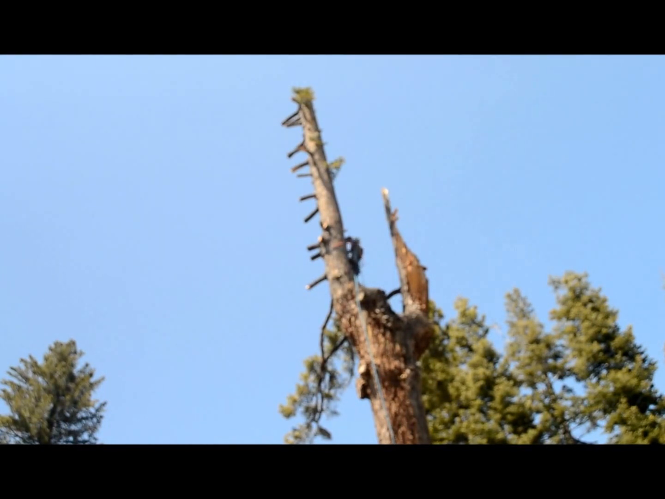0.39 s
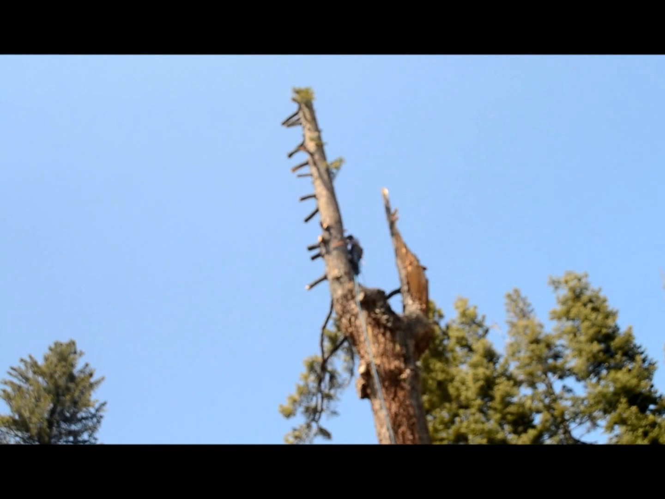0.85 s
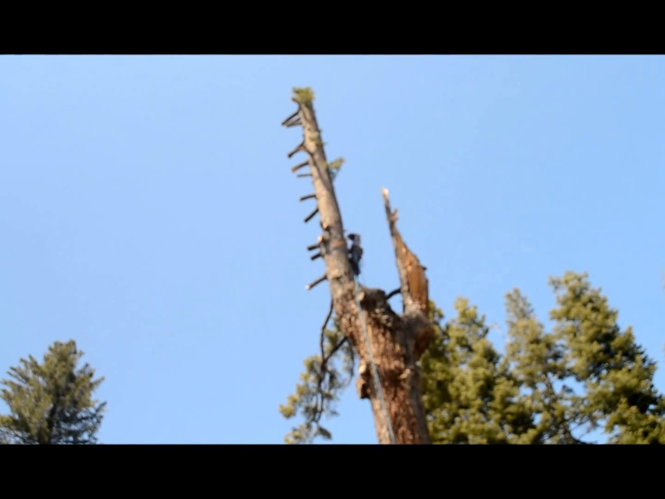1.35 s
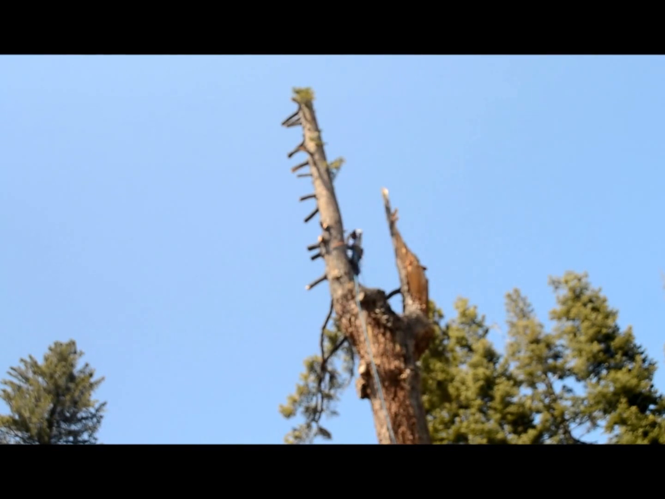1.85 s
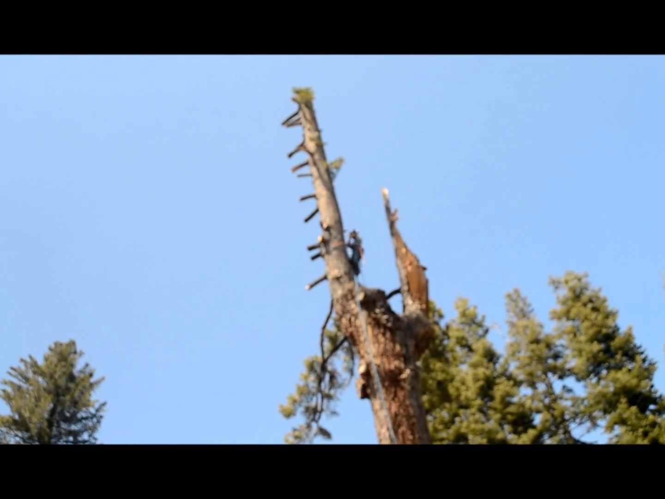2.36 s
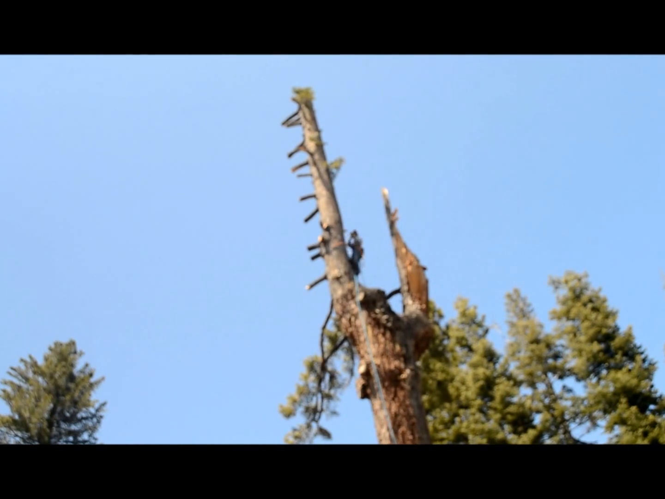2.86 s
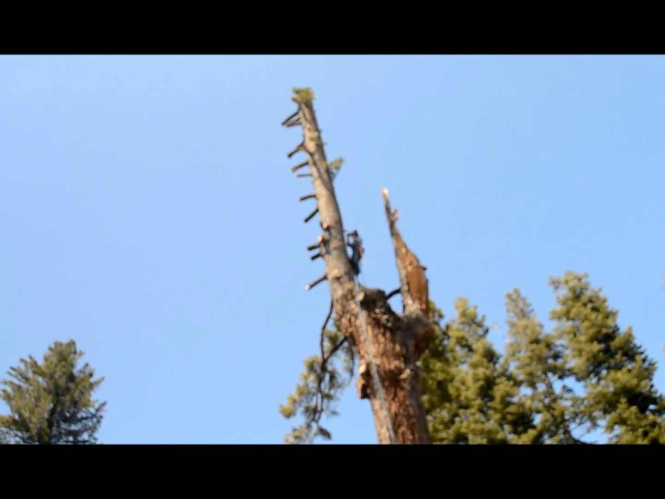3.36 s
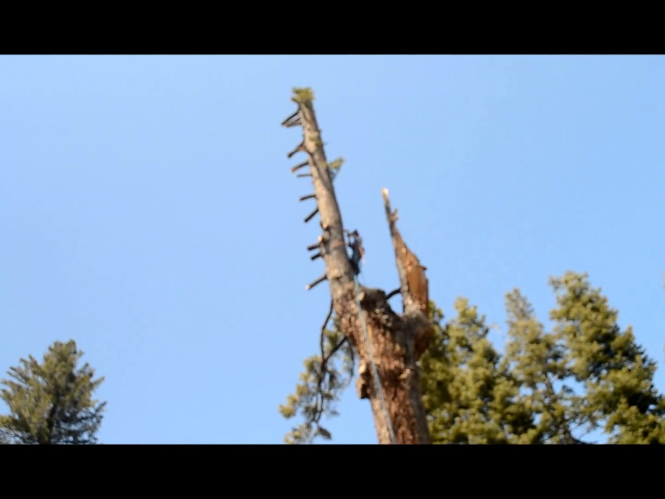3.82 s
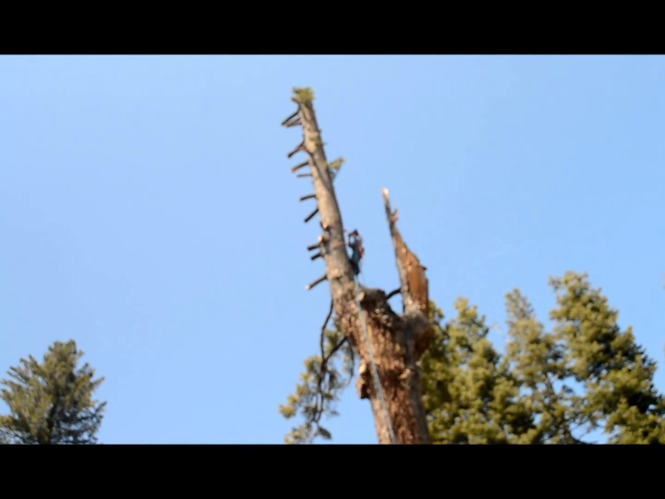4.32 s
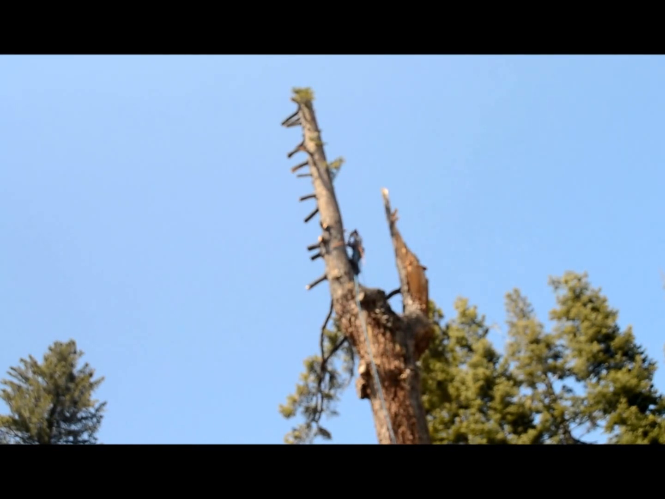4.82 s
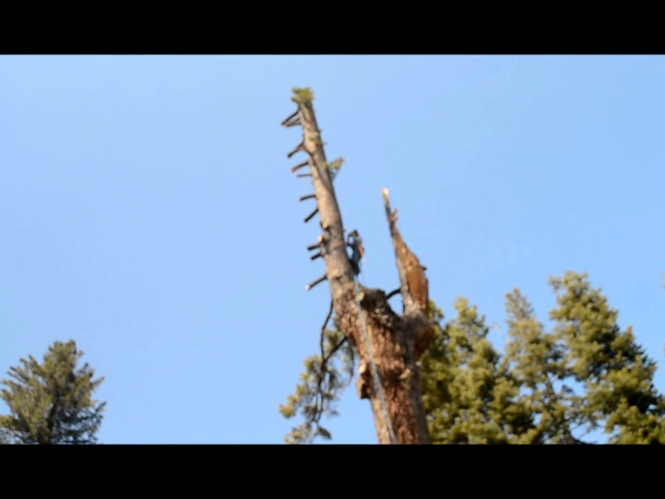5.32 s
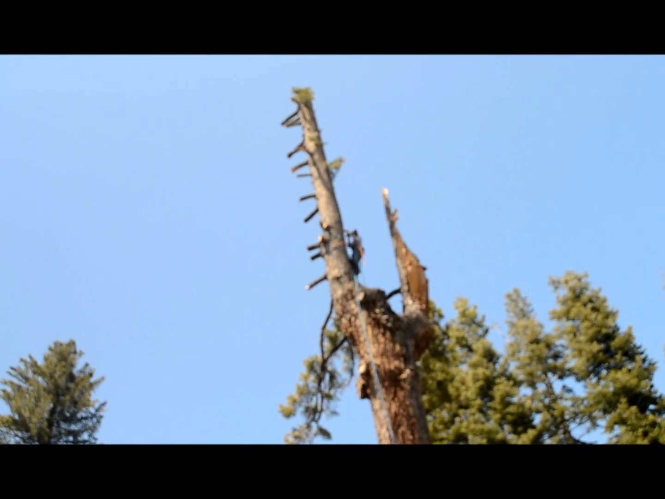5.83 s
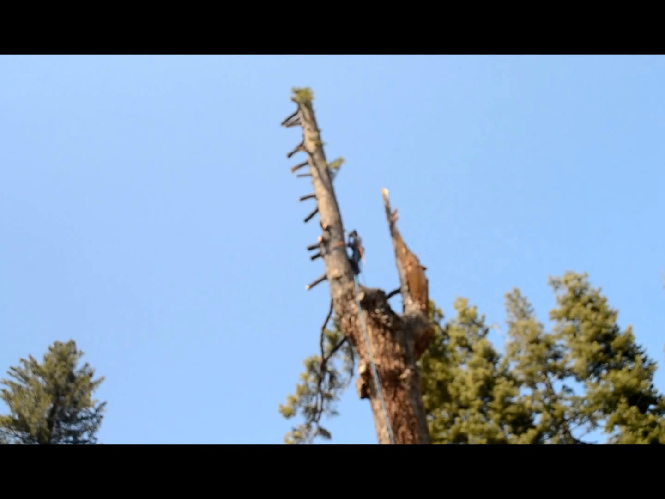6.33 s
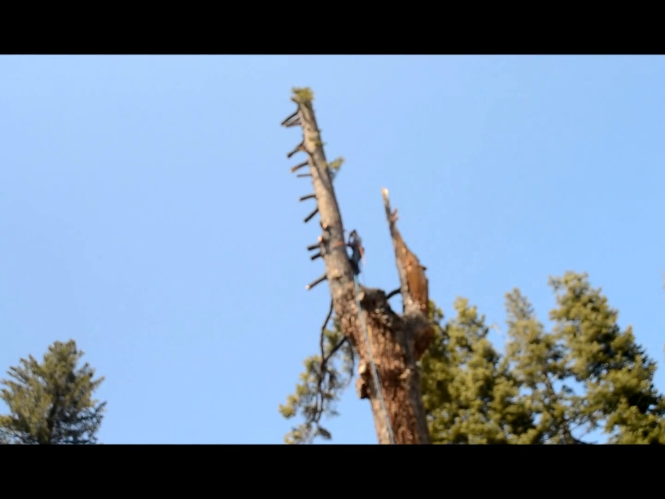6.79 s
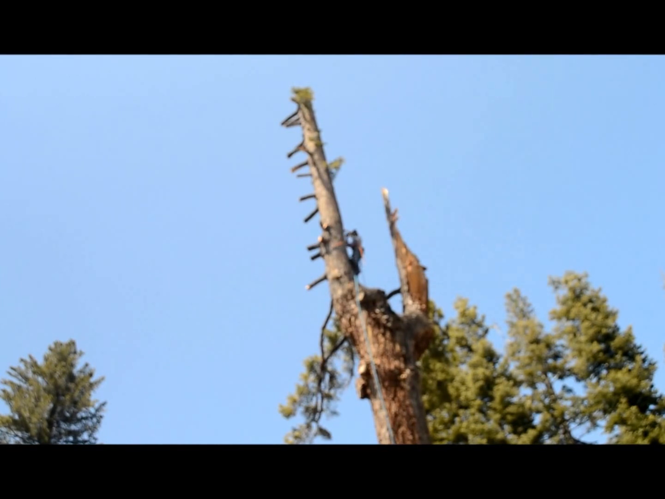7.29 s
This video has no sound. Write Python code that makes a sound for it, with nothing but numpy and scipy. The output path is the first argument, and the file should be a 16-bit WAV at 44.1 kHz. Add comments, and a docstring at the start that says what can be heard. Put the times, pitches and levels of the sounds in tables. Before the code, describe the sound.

A quiet conifer forest with faint airy hush and tiny twig ticks. For about two seconds, light irregular knocks and soft scrapes touch bark. After a short pause, thirteen loud hatchet-like blows strike a dead trunk at a steady quick pace, each a short hollow knock with a sharp snap and fibre crackle. Ground bounce and tree echoes follow each one, heard at a single outdoor microphone with slight wind puffs.

```python
"""A faint hush, light knocks, then thirteen hatchet blows high on a dead trunk in a conifer forest.
Each blow is a handful of quickly dying tones, plus a sharp snap and a little noise from splitting fibres.
Knocks and blows bounce off the ground; all but the fibre noise also come back from the trees as echoes.
Shaped noise makes the far air, the rustling needles, the dry twigs and the wind puffs at the microphone."""
import sys
import numpy as np
from scipy import signal
from scipy.fft import rfft, irfft, next_fast_len
from scipy.io import wavfile
from scipy.ndimage import map_coordinates

SR = 44100
rng = np.random.default_rng(int(sys.argv[2]) if len(sys.argv) > 2 else 0)


def transcribe(u):
    """Save the signal u as a 16-bit wav file named by the first command-line argument.

    u: samples, shape (n,) or (channels, n), limited to [-1, 1]; the rate is SR.
    q: integer samples, one column per channel.
    """
    v = np.clip(np.atleast_2d(u).T, -1, 1)
    q = np.round(v * 32767).astype(np.int16)
    wavfile.write(sys.argv[1], SR, q)


def voltage_ratio(level):
    """Linear amplitude factor for a level in decibels (scalar or array-like)."""
    return 10 ** (np.asarray(level, float) / 20)


N = 338247  # length of the scene in samples

# colour of splitting fibres, also of the rasp of a knock: (frequency [Hz], relative level [dB])
FIBRE_COLOUR = [(400, -89), (1500, 16.5), (3000, 10.5), (5000, 3), (7000, 0.5), (10000, -2), (14000, 2.5)]
# branches of the struck tree, the stand across the clearing, and a faint, long-lasting wash of echoes
# from the whole forest; each cloud starts, holds and dies:
# (first return [s], hold [s], level [dB], time to fall 60 dB [s])
ECHO_CLOUDS = [(.007, 0.0014, -32.5, 0.13), (0.052, .045, -39.5, 0.067), (0.017, .1, -46.5, 2.2)]


def unit(x):
    """Scales a sound to an rms of 1."""
    return x / np.sqrt(np.mean(x ** 2) + 1e-20)


def along(points, hz):
    """Reads (Hz, value) points at any frequency, with straight lines on a log axis."""
    point_hz, value = np.transpose(points)
    return np.interp(np.log(hz + 1), np.log(point_hz + 1), value)


def filtered(x, response):
    """Multiplies the spectrum of x by a response that depends on frequency."""
    n = np.shape(x)[-1]
    padded = next_fast_len(n + 8192)
    spectrum = rfft(x, padded) * response(np.fft.rfftfreq(padded, 1 / SR))
    return irfft(spectrum, padded)[..., :n]


def noise(colour, n):
    """Random noise given a colour of (Hz, dB) points and an rms of 1."""
    white = rng.standard_normal(n)
    return unit(filtered(white, lambda hz: voltage_ratio(along(colour, hz))))


def wobble(rate):
    """A smooth random curve through `rate` random points a second."""
    knots = rng.standard_normal(int(N * rate / SR) + 4)
    return map_coordinates(knots, [np.arange(N) * rate / SR])


def add(track, s, sound):
    """Mixes a sound into a track at s seconds."""
    part = track[round(s * SR):][:len(sound)]
    part += sound[:len(part)]


def air():
    """Far steady hush, wind in the needles and low wind puffs at the microphone, all coloured noise."""
    # colours of the three noises: (frequency [Hz], relative level [dB per Hz])
    hush_colour = [(59, -12), (100, -8), (171, -2.5), (200, -8.5), (234, -3.5), (369, -3), (582, -2.5),
                   (800, -1), (2520, -6), (9500, -26), (11400, -40), (14800, -59), (22000, -120)]
    needle_colour = [(4000, -38), (6500, -3), (9000, -5), (11000, 3), (13000, -30)]
    puff_colour = [(15, -19), (40, -8.5), (70, -4), (120, -11), (250, -66)]
    # wind in the needles, before its flutter: (time [s], level [dB])
    rustle_levels = [(0, -69), (.3, -70), (.5, -75), (2.4, -72), (3.5, -84), (4.15, -69), (4.4, -77),
                     (4.7, -75), (4.88, -63.5), (5.15, -69), (5.4, -65), (5.9, -65.5), (6.5, -75.5),
                     (7.67, -72)]
    # wind at the microphone, before its flutter: (time [s], level [dB])
    puff_levels = [(0, -60), (.25, -70), (.7, -75), (1.3, -98), (1.9, -85), (2.27, -65), (2.6, -87),
                   (3.5, -74), (4.4, -73), (4.75, -80), (5.04, -61), (5.35, -78), (5.9, -65.5), (6.5, -76),
                   (7.2, -77), (7.67, -70)]
    t = np.arange(N) / SR
    hush_db = -53.5 + 0.6 * wobble(3)
    rustle_db = np.interp(t, *np.transpose(rustle_levels)) + 1.5 * wobble(12)
    puff_db = np.interp(t, *np.transpose(puff_levels)) + 2.5 * wobble(7)
    hush = voltage_ratio(hush_db) * noise(hush_colour, N)
    rustle = voltage_ratio(rustle_db) * noise(needle_colour, N)
    puffs = voltage_ratio(puff_db) * noise(puff_colour, N)
    return hush + rustle + puffs


def contact_band(hz, n):
    """A narrow band of noise around the pitch of a contact."""
    colour = [(hz / 3, -40), (hz / 1.5, -10), (hz, 0), (hz * 1.5, -10), (hz * 4, -30), (22000, -50)]
    return noise(colour, n)


def taps():
    """Light knocks and softer scrapes on the bark: a band at the contact pitch, a low knock, a bright rasp."""
    # light knocks; the last two levels are relative to the band at the contact pitch:
    # (time [s], level [dB], centre [Hz], rasp level [dB], low knock level [dB])
    knocks_on_bark = [(0.21, -32.5, 1330, -4, -2.5), (0.307, -34.5, 1290, -30, -28),
                      (0.639, -42.5, 1410, -6, -16), (1.27, -40.5, 980, -31, -2),
                      (1.598, -32, 1450, -0.5, -8), (1.945, -36.5, 1780, -4, -2.5)]
    # soft scrapes: (time [s], level [dB], centre [Hz], fade time [s])
    scrapes = [(0.276, -51, 1220, 0.015), (0.456, -42.5, 1780, .043), (0.929, -49, 800, 0.079),
               (0.969, -43.5, 1340, 0.026), (1.054, -46, 900, 0.081)]
    knock_fade_s = 0.027
    scrape_rasp_db, scrape_low_db = -6.5, -8
    t = np.arange(SR // 10) / SR
    contacts = [(*row, knock_fade_s) for row in knocks_on_bark]
    contacts += [(s, db, hz, scrape_rasp_db, scrape_low_db, fade_s) for s, db, hz, fade_s in scrapes]
    events = []
    for s, db, hz, rasp_db, low_db, fade_s in contacts:
        burst = contact_band(hz, len(t))
        burst += voltage_ratio(low_db) * contact_band(600, len(t))
        burst += voltage_ratio(rasp_db) * noise(FIBRE_COLOUR, len(t))
        onset = 1 - np.exp(-t / 0.00049)
        # 4.5 dB below the level in the row, and 60 dB down after the fade time
        fade = voltage_ratio(db - 4.5 - 60 * (t / fade_s) ** 2)
        events.append((s, fade * onset * burst, 0))
    return events


def scatter():
    """One random draw of the echo clouds: noise in which each frequency fades at its own extra speed."""
    # change of level as the echoes age: (frequency [Hz], slope [dB/s])
    ageing = [(150, -63), (400, -8.5), (1000, 7.5), (2000, -14.5), (4000, 4), (10000, -26)]
    n = round(1.2 * SR)  # 1.2 s of echoes
    rise_s = 0.002
    hz, t, z = signal.stft(rng.standard_normal(n), SR, nperseg=512)
    aged = z * voltage_ratio(t * along(ageing, hz)[:, None])
    tail = signal.istft(aged, SR, nperseg=512)[1][:n]
    t = np.arange(n) / SR
    power = 0
    for first, hold, db, t60 in ECHO_CLOUDS:
        rise = np.clip((t - first) / rise_s, 0, 1)
        fade = voltage_ratio(db - 60 * np.maximum(t - first - hold, 0) / t60)
        power = power + (rise * fade) ** 2
    return tail * np.sqrt(power)


def stand():
    """Fourteen trunks of mixed girth, thus mixed pitch, spread at random through the near stand."""
    count = 14
    first, hold = ECHO_CLOUDS[1][:2]
    place = rng.random(count)
    girth, size = rng.standard_normal((2, count))
    delay = first + hold * place
    hz = 1305 * np.exp(2.3 * girth)  # pitches spread widely around 1305 Hz
    db = -19 + size
    return list(zip(delay, hz, db))


def forest(events, same, cycles):
    """Direct sound, ground bounce and echoes; trees stand still, so a share `same` of scatter power repeats."""
    # single trunks that answer clearly, each favouring a pitch set by its girth; levels are
    # before the colour of the bark: (delay [s], frequency [Hz], level [dB])
    clear_trunks = [(.0135, 555, -21), (.029, 1500, -22), (.052, 1700, -6), (0.0624, 1540, -13),
                    (0.071, 1040, -11), (0.078, 1060, -6.5), (.097, 1470, -14), (.157, 970, -11),
                    (.219, 756, -15), (0.23, 1440, -19.5), (.243, 623, -16.5)]
    # colour of every echo: (frequency [Hz], level [dB])
    bark_colour = [(150, 4.5), (380, -5), (600, 7.5), (760, -6), (1050, -1), (1400, -8.5), (1800, -6.5),
                   (2500, -1), (4000, -3.5), (7000, -6.5), (11000, -6)]
    ground_delay_s, ground_db, ground_dull_hz = 0.0054, -6, 2570  # soft soil dulls the treble
    still = np.sqrt(same) * scatter()
    t = np.arange(SR // 40) / SR
    for delay, hz, db in clear_trunks + stand():
        fading = np.exp(-t * hz / cycles)  # a return that rings for a few cycles
        answer = np.cos(2 * np.pi * hz * t) * 2 * fading / fading.sum()
        add(still, delay, voltage_ratio(db) * answer)
    out = np.zeros(N)
    for s, echoed, direct_only in events:  # direct_only gets the ground bounce but no echoes from the trees
        sound = echoed + direct_only
        fresh = np.sqrt(1 - same) * scatter()
        echoes = filtered(still + fresh, lambda hz: voltage_ratio(along(bark_colour, hz)))
        bounce = filtered(sound, lambda hz: 1 / (1 + 1j * hz / ground_dull_hz))
        add(out, s, sound)
        add(out, s + ground_delay_s, voltage_ratio(ground_db) * bounce)
        add(out, s, signal.fftconvolve(echoed, echoes))
    # high-pass: little deep bass in knocks, blows and echoes
    return signal.sosfilt(signal.butter(4, 150, "high", fs=SR, output="sos"), out)


def twigs():
    """Dry twigs tick: very short bursts of bright noise."""
    # ticks: (time [s], level [dB], centre [Hz])
    ticks = [(0.4319, -38, 9700), (0.631, -41, 9420), (0.7292, -49, 5230), (0.7853, -46, 6590),
             (1.3296, -53, 5830), (1.5645, -50, 6500), (2.8092, -41.5, 7610), (4.172, -47, 8430),
             (4.8762, -43.5, 9700), (4.913, -41, 6160), (5.1684, -40, 5100), (5.643, -41, 5160)]
    t = np.arange(SR // 50) / SR
    out = np.zeros(N)
    for s, db, hz in ticks:
        colour = [(hz / 3, -25), (hz / 1.3, -3), (hz, 0), (hz * 1.5, -5), (22000, -20)]
        fade = voltage_ratio(db - 5.5 - 60 * t / 0.012)  # starts 5.5 dB below the level in the row
        add(out, s, fade * noise(colour, len(t)))
    return out


def ringing(modes, t):
    """Sums dying tones, the modes of the wood, each at a slightly new strength and pitch."""
    spread_db = 1.8  # no two blows drive a mode alike
    detune = 0.02  # share by which the biting edge shifts a mode
    total = 0
    for hz, db, t60, sense in modes:
        strength = voltage_ratio(db + spread_db * rng.standard_normal() - 60 * t / t60)
        pitch = hz * (1 + detune * rng.standard_normal())
        total = total + np.sign(sense) * strength * np.sin(2 * np.pi * pitch * t)
    return total


def hatchet():
    """Every blow rings the same trunk modes at new strengths, snaps once and splits a few fibres."""
    # blows; the ring and crack levels are relative to the rest of the blow:
    # (time [s], level [dB], ring [Hz], ring level [dB], crack level [dB])
    strikes = [(2.491, -3, 1294, -4, -2.5), (2.977, -3, 1300, 1.5, 0.5), (3.405, -1.5, 1342, 0, 2.5),
               (3.831, -6.5, 1423, 4.5, 3.5), (4.227, -4.5, 1429, 4, 0), (4.629, -2.5, 1460, -2, -2),
               (5.021, -2, 1400, -1.5, -2.5), (5.429, -4.5, 1430, 4, 3.5), (5.821, -1, 1394, -5, -2.5),
               (6.2, -1.5, 1348, -2.5, -2.5), (6.599, -4, 1260, -1, -2), (6.983, -1.5, 1356, -5, -7.5),
               (7.36, 0, 1300, -2.5, -5.5)]
    # low and high trunk modes; like senses leave a gap between neighbours, unlike ones swell:
    # (frequency [Hz], relative level [dB], time to fall 60 dB [s], sense of the first swing [+1 or -1])
    thud_modes = [(220, -32.5, 0.065, 1), (408, -11.5, 0.02, -1), (600.5, -21.5, 0.025, -1),
                  (713, -7.5, 0.015, -1), (914, -9, 0.011, 1)]
    knock_modes = [(1766, -3, 0.011, 1), (2208, -18, 0.01, -1), (2875, -24, 0.019, 1),
                   (3580, -32, 0.0029, -1)]
    thud_db, thud_follows, thud_db_per_s = -1.5, 0.39, 0.12  # follows: share of a blow's level in dB
    ring_t60_s = 0.014
    low_cut_hz = 244  # the struck tones are thin below this
    hum_hz, hum_db, hum_t60_s, hum_db_per_s = 179, -36, 0.2, -3  # deepest mode, weaker as the notch deepens
    ahead_s = 0.0026  # the edge bites the bark just before the blow
    bite = (650, -20, 0.009, -1)  # the same columns as the mode tables
    t = np.arange(SR // 4) / SR
    click = 1. * (np.arange(len(t)) == SR // 1400)
    snap = filtered(click, lambda hz: voltage_ratio(along(FIBRE_COLOUR, hz)))
    blows = []
    for s, db, ring_hz, ring_db, crack_db in strikes:
        since_first = s - strikes[0][0]
        # the low modes follow the blow's level only in part and grow as the notch deepens
        low_db = thud_db - (1 - thud_follows) * db + thud_db_per_s * since_first
        wood = voltage_ratio(low_db) * ringing(thud_modes, t)
        wood += ringing(knock_modes, t)
        # the main mode, whose pitch shifts as the notch deepens
        wood += ringing([(ring_hz, ring_db, ring_t60_s, -1)], t)
        wood *= 1 - np.exp(-t / 0.0003)  # the edge sinks in
        wood = filtered(wood, lambda hz: 1 / (1 - 1j * low_cut_hz / (hz + 1)) ** 2)
        hum = ringing([(hum_hz, hum_db + hum_db_per_s * since_first, hum_t60_s, 1)], t)
        wood += hum * (1 - np.exp(-t / 0.012))  # slow to start
        # a quick crackle and a weaker, longer one
        fibre_fade = voltage_ratio(-16.5 - 60 * t / 0.012) + voltage_ratio(-25 - 60 * t / 0.06)
        fibres = fibre_fade * noise(FIBRE_COLOUR, len(t))
        # echoes are made from the tones and snap only
        echoed = ringing([bite], t)
        add(echoed, ahead_s, wood + voltage_ratio(crack_db - 6) * snap)
        direct_only = np.zeros(len(t))
        add(direct_only, ahead_s, voltage_ratio(crack_db) * fibres)
        start = s + 0.000985 - ahead_s  # the wood starts about 1 ms after the time in the row
        blows.append((start, voltage_ratio(db) * echoed, voltage_ratio(db) * direct_only))
    return blows


def scene():
    """All sources at one microphone; twigs and air get no echoes."""
    wood = forest(hatchet() + taps(), same=0.75, cycles=2)
    return (wood + twigs() + air())[None]


def low_pass(x):
    """Removes everything above the highest recorded frequency."""
    return signal.sosfilt(signal.butter(12, 11500, fs=SR, output="sos"), x)


def record(dry):
    """The microphone housing cuts a dip, the treble is limited, and peaks near full scale are rounded off."""
    # treble limit: (frequency [Hz], level [dB])
    treble_limit = [(20, -3.5), (9500, 1.5), (10500, -11), (11200, -18.5), (11700, -66), (22000, -70)]
    dip_hz, dip_width_hz, dip_depth = 7920, 520, 0.52  # depth as a share from 0 to 1

    def colour(hz):
        dip = 1 - dip_depth / (1 + ((hz - dip_hz) / dip_width_hz * 2) ** 2)
        return voltage_ratio(along(treble_limit, hz)) * dip

    coloured = filtered(dry, colour)
    mix = coloured / (1 + np.abs(coloured) ** 6) ** (1 / 6)  # peaks bend towards a ceiling of 1
    return low_pass(mix)


dry = scene()
out = record(dry)
transcribe(out)
```